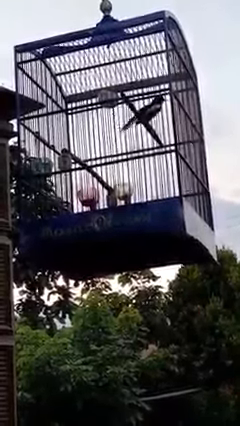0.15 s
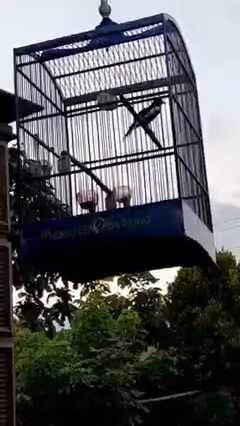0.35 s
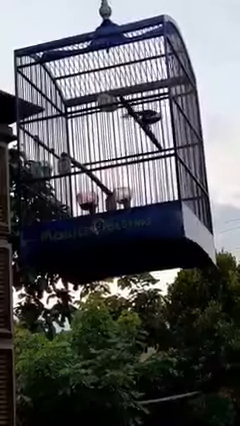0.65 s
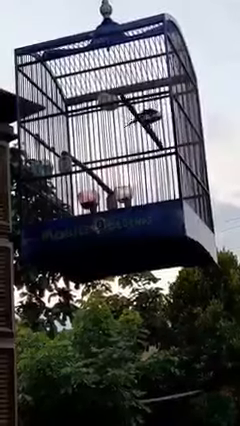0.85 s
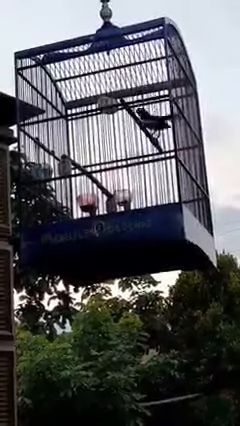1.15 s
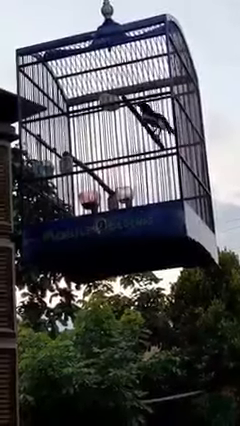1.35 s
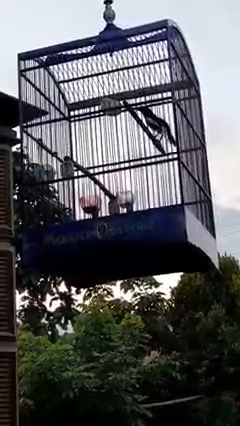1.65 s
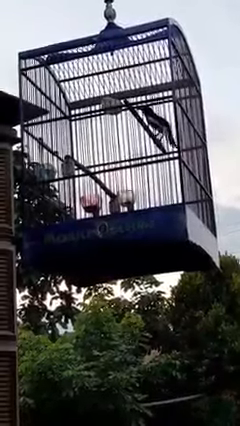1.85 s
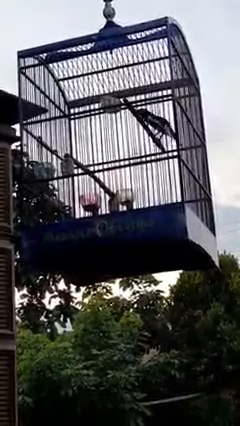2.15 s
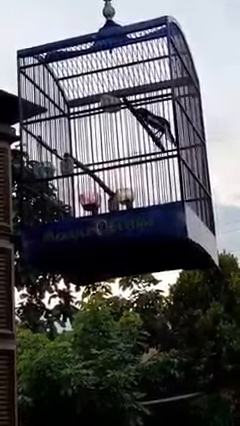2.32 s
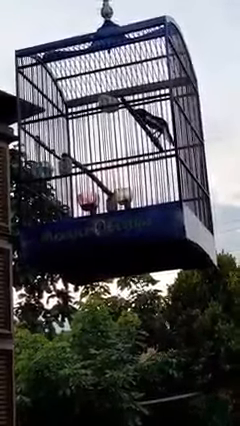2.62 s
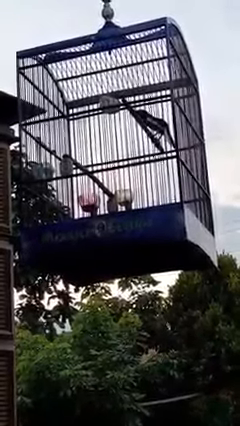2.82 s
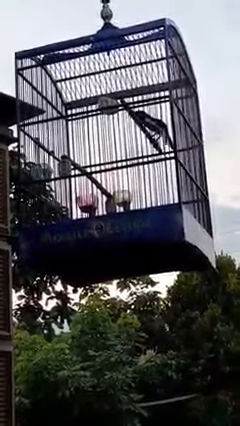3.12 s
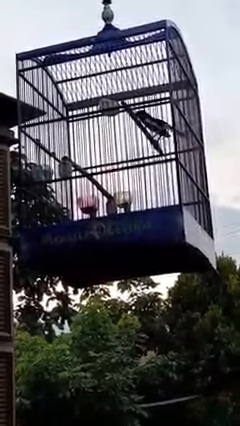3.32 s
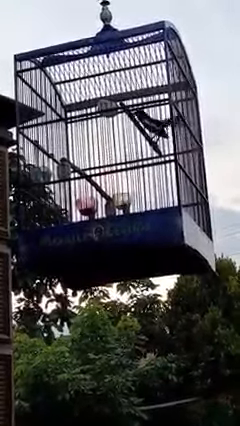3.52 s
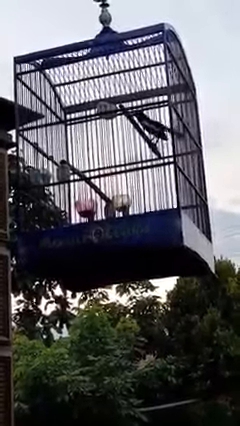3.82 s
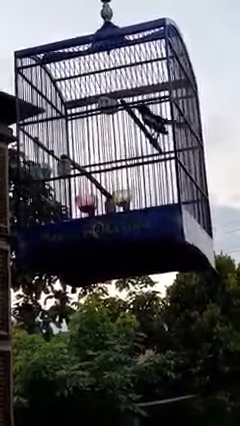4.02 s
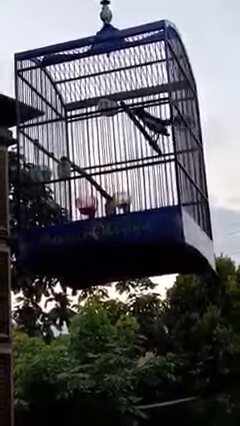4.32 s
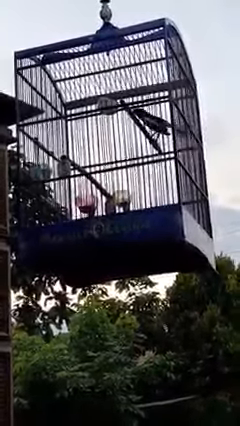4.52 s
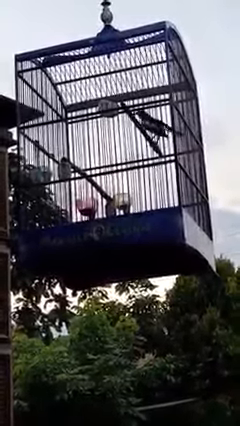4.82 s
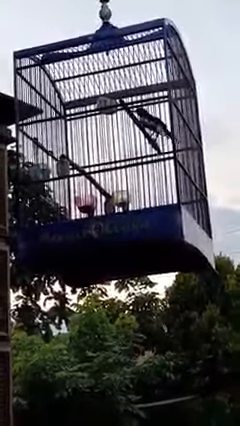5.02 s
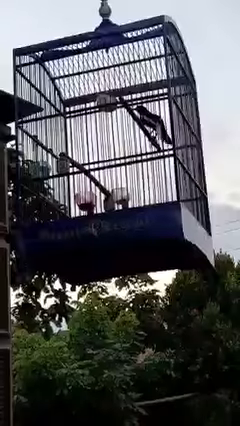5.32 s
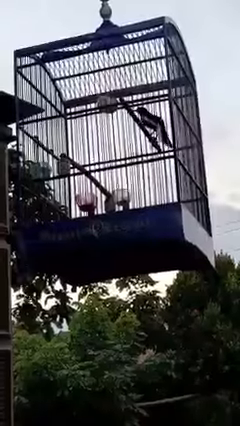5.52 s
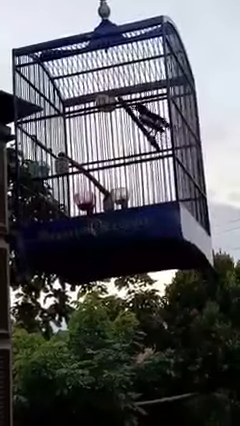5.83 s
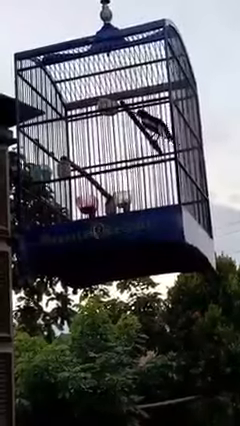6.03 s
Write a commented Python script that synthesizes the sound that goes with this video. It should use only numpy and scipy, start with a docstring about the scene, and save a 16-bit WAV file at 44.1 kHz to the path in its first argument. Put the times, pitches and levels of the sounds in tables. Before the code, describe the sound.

A caged songbird sings nearby in a yard, mixing quick clear whistles with hoarse glides, reedy warbles and rasps. Its claws tap the perch a few times early on. Near the end it changes to a run of sharp, high chips while another bird softly alternates low and high notes. A very faint rooster crows far off, and distant traffic rumbles low throughout.

```python
"""Caged magpie-robin in a yard.

Airflow shakes the bird's membranes into pure whistles, reedy twangs, rasps, slurs, nasal notes and a run
of sharp chips. Its claws tap the perch. Other birds whistle further off; a rooster crows far away.
House walls and trees answer, over the low rumble of distant traffic."""
import sys
import numpy as np
from scipy import signal
from scipy.fft import rfft, irfft, next_fast_len
from scipy.io import wavfile
from scipy.ndimage import uniform_filter1d, map_coordinates

SR = 44100
rng = np.random.default_rng(int(sys.argv[2]) if len(sys.argv) > 2 else 0)


def log_audio(samples):
    """Write samples as a 16-bit WAV file to the path given in sys.argv[1]."""
    # one column per channel
    frames = np.atleast_2d(samples).T
    # limit to full scale, then quantise
    limited = np.clip(frames, -1, 1)
    pcm = np.round(limited * 32767).astype(np.int16)
    wavfile.write(sys.argv[1], SR, pcm)


N = 271653
TIME_S = np.arange(N) / SR


def amp(db):
    """Decibels to gain."""
    return 10 ** (np.asarray(db) / 20)


def unit(x):
    """x at rms 1."""
    return x / np.sqrt(np.mean(x ** 2) + 1e-20)


def along(points, hz):
    """Interpolate (frequency [Hz], value) points on a log axis."""
    knots_hz, values = np.transpose(points)
    return np.interp(np.log(hz + 1), np.log(knots_hz + 1), values)


def gate(t, start_s, end_s, edge_s):
    """1 from start to end, soft edges outside."""
    rise = np.clip((np.minimum(t - start_s, end_s - t) + edge_s) / edge_s, 0, 1)
    return np.sin(rise * np.pi / 2) ** 2


def wobble(rate_hz, size=N):
    """Smooth random curve, rate_hz knots a second."""
    knots = rng.standard_normal(size // 4 + 8)
    return map_coordinates(knots, [np.arange(size) * rate_hz / SR], mode="mirror")


def filtered(x, response):
    """Apply a gain that depends on frequency."""
    size = next_fast_len(N + SR // 4)
    return irfft(rfft(x, size) * response(np.fft.rfftfreq(size, 1 / SR)), size)[..., :N]


def noise(spectrum):
    """Coloured noise, rms 1."""
    return unit(filtered(rng.standard_normal(N), lambda hz: amp(along(spectrum, hz))))


def glides(table, rise_db, fall_db, bend, swell=1.12):
    """Note paths (time [s], pitch [Hz], level [dB]); bend 1 glides straight, 2 rounds the crest."""
    x = np.linspace(-1, 1, num=41)
    away, before = np.abs(x), x < 0
    return [(start_s + attack_s + x * np.where(before, attack_s, release_s),
             crest_hz + (np.where(before, start_hz, end_hz) - crest_hz) * away ** bend,
             crest_db - np.where(before, rise_db, fall_db) * away ** swell)
            for start_s, attack_s, release_s, start_hz, crest_hz, end_hz, crest_db in table]


# Breath spectrum: (frequency [Hz], level [dB])
BREATH = [(3500, -35.5), (5500, 9.5), (6500, 14.5), (7800, 15), (8800, -10.5), (11500, 6), (14500, 4.5),
          (16000, -13)]

def sing(paths, harmonics_db, jitter, flutter_db, flutter_hz, edge_s, hiss_db=-60, order=1):
    """A membrane vibrates; uneven airflow shakes it and hisses. Harmonic `order` follows each path."""
    tone, flow = np.zeros((2, N))
    for path_s, path_hz, path_db in paths:
        i = np.arange(max(0, int((path_s[0] - edge_s) * SR)), min(N, int((path_s[-1] + edge_s) * SR)))
        t = i / SR
        pitch_hz = uniform_filter1d(np.interp(t, path_s, path_hz), 160) / order  # muscles round corners
        shaken_hz = pitch_hz * (1 + jitter * wobble(flutter_hz, len(t)))
        phase = 2 * np.pi * np.cumsum(shaken_hz) / SR
        wave = sum(amp(db) * np.sin(k * phase) * (k * pitch_hz < SR / 2)
                   for k, db in enumerate(harmonics_db, 1))
        level_db = np.interp(t, path_s, path_db) + flutter_db * wobble(flutter_hz, len(t))
        level = amp(level_db) * gate(t, path_s[0], path_s[-1], edge_s)
        tone[i] += np.sqrt(2) * wave * level
        flow[i] += level
    return tone + amp(hiss_db) * flow * noise(BREATH)


def stereo_noise(spectrum, side_db):
    """Common noise plus a side noise of opposite sign in each channel."""
    return noise(spectrum) + amp(side_db) * np.array([[1], [-1]]) * noise(spectrum)


# Rumble envelope: (time [s], level [dB])
RUMBLE_LEVEL = [(0.03, -39.5), (0.88, -44), (2.24, -43), (5.81, -41.5), (5.93, -43), (6.13, -35.5)]
# Rumble spectrum: (frequency [Hz], density [dB])
RUMBLE = [(13, -48), (22, -26.5), (54, -1), (102, 1.5), (225, -6), (296, -9.5), (407, -20), (468, -23.5),
          (560, -24), (600, -27), (780, -29), (1320, -120)]

def rumble(deep_hz=75, deep_start_db=-15, fade_s=1.54):
    """A low, distant rumble; the deepest bass fades in at the start."""
    level_db = np.interp(TIME_S, *np.transpose(RUMBLE_LEVEL))
    full = amp(level_db) * stereo_noise(RUMBLE, side_db=-15.5)
    deep = filtered(full, lambda hz: 1 / (1 + (hz / deep_hz) ** 4))
    deep_db = deep_start_db * np.clip(1 - (TIME_S / fade_s) ** 2, 0, 1)
    return full - deep + amp(deep_db) * deep


# Air spectrum: (frequency [Hz], density [dB])
AIR = [(240, -15), (400, -5.5), (2190, -10.5), (2430, -9), (4490, -7.5), (6680, -15), (7910, -16),
       (9500, -21), (13900, -15), (15500, -28)]

def open_air():
    """A wide, slowly wavering hiss."""
    return amp(-56 + 2.9 * wobble(2.1)) * stereo_noise(AIR, side_db=-0.5)


# Whistles: (start [s], attack [s], release [s], start [Hz], crest [Hz], end [Hz], crest [dB])
WHISTLES = [ (0.0, 0.0017, 0.018, 6000, 5920, 5780, -30.5), (0.112, 0.019, .012, 3730, 4310, 4150, -19),
            (0.178, 0.017, 0.039, 2020, 2638, 2496, -20), (0.243, 0.013, 0.019, 2730, 3336, 3050, -24),
            (1.349, 0.0083, 0.032, 6180, 5970, 5990, -19.5),
            (1.714, 0.0096, 0.036, 5520, 5800, 5890, -14.5), (1.945, 0.051, 0.06, 2340, 2660, 2560, -23),
            (2.4, 0.0089, 0.019, 3190, 3000, 3000, -20), (2.432, 0.0068, 0.0386, 2875, 2837, 2772, -11.5),
            (2.492, 0.026, 0.015, 2720, 2790, 3020, -19), (3.09, 0.048, 0.025, 3130, 2897, 2890, -17.5),
            (4.215, 0.058, 0.059, 2685, 2830, 2858, -30.5), (4.648, 0.049, 0.033, 3280, 3030, 2976, -23), ]
# Harmonics 1, 2, ... [dB]
PURE_DB = [0, -27.5, -85]

def whistles():
    """Clear notes, almost pure sines."""
    paths = glides(WHISTLES, rise_db=10.5, fall_db=7, bend=2.07, swell=1.7)
    return sing(paths, PURE_DB, jitter=0.003, flutter_db=1.2, flutter_hz=370, edge_s=0.003)


# Twangs: (start [s], attack [s], release [s], start [Hz], crest [Hz], end [Hz], crest [dB])
TWANGS = [ (0.02, 0.00815, 0.0043, 1347, 2276, 1320, -32.5), (0.352, 0.017, 0.025, 2270, 1780, 1320, -46),
          (1.61, 0.04, 0.051, 1537, 2342, 2700, -31.5), (2.626, 0.01114, 0.03, 1517, 2340, 1360, -32),
          (2.693, 0.013, 0.0079, 1395, 2390, 2200, -31), (2.898, 0.0129, 0.034, 1470, 2257, 1417, -33),
          (2.98, 0.0137, 0.0017, 1467, 2270, 2240, -32), (4.165, .013, 0.0027, 1590, 2500, 2300, -32),
          (4.18, 0.0088, 0.0068, 2270, 2010, 2210, -29), (4.41, 0.041, 0.058, 1646, 1900, 1984, -36.5),
          (4.516, 0.0039, 0.023, 1850, 1976, 2640, -34), (4.533, 0.0119, 0.02, 2270, 2137, 1885, -31), ]
# Harmonics 1, 2, ... [dB]
REEDY_DB = [7, -9.5, -32, -22, -44]

def twangs():
    """Quick, low warbles with a reedy edge."""
    paths = glides(TWANGS, rise_db=15.5, fall_db=13.5, bend=1.2, swell=0.86)
    return sing(paths, REEDY_DB, jitter=0.019, flutter_db=3, flutter_hz=900, edge_s=0.0027, hiss_db=-17)


# Rasp bursts: (crest [s], attack [s], release [s], throat [dB], hiss [dB])
RASPS = [ (0.14, 0.11, 0.061, -41, -27.5), (1.195, 0.084, 0.029, -41, -36), (2.29, 0.082, 0.21, -38, -31.5),
         (2.67, 0.038, 0.033, -27, -35), (2.75, 0.038, 0.013, -16.5, -29),
         (2.848, 0.066, 0.024, -26, -30.5), (2.942, 0.053, .04, -28.5, -29.5),
         (3.091, 0.035, 0.11, -39, -37.5), (3.476, 0.056, 0.02, -35, -47), (4.335, 0.037, .1, -39.5, -69.5),
         ]
# Throat spectrum: (frequency [Hz], level [dB])
THROAT = [(2500, -37), (3500, -15), (3950, 5.5), (4400, -15), (4950, -4), (5600, -42)]

def rasps(pulse_hz=420, depth=0.58, drop_db=17.5):
    """Membranes flap chaotically and chop the air into rough pulses."""
    throat, hiss, air = noise(THROAT), noise(BREATH), np.zeros(N)
    for crest_s, attack_s, release_s, throat_db, hiss_db in RASPS:
        away = np.maximum((crest_s - TIME_S) / attack_s, (TIME_S - crest_s) / release_s)
        flow = amp(-drop_db * away) * gate(TIME_S, crest_s - attack_s, crest_s + release_s, 0.0031)
        air += flow * (amp(throat_db) * throat + amp(hiss_db) * hiss)
    flap_hz = pulse_hz * (1 + 0.15 * wobble(200))
    flaps = 1 + depth * np.sin(2 * np.pi * np.cumsum(flap_hz) / SR)
    return air * unit(flaps)


# Slurs: (start [s], attack [s], release [s], start [Hz], crest [Hz], end [Hz], crest [dB])
SLURS = [ (0.076, 0.021, 0.015, 4480, 5580, 6200, -27), (0.135, 0.007, 0.024, 4190, 3850, 2980, -26),
         (0.155, 0.0075, 0.016, 6500, 5980, 5300, -27), (1.085, 0.038, 0.011, 1668, 2480, 3000, -25.5),
         (1.145, 0.042, 0.014, 3394, 4370, 4890, -13.5), (1.49, 0.044, 0.04, 3220, 4200, 5220, -18.5),
         (2.025, 0.022, 0.032, 2160, 2040, 1132, -32), (2.195, 0.026, 0.024, 2980, 3730, 5150, -24.5),
         (2.238, .043, .028, 5420, 5356, 5740, -21), (2.255, 0.033, 0.034, 5900, 6580, 6190, -23),
         (2.397, 0.0073, 0.011, 4200, 4020, 3910, -22.5), (4.315, 0.009, 0.025, 4420, 4650, 4200, -38), ]
# Harmonics 1, 2, ... [dB]
HOARSE_DB = [1, -13.5, -11.5, -28]

def slurs():
    """Fast, hoarse glides."""
    paths = glides(SLURS, rise_db=14.5, fall_db=11, bend=1, swell=1.36)
    return sing(paths, HOARSE_DB, jitter=0.027, flutter_db=4, flutter_hz=1100,
                edge_s=0.0047, hiss_db=-23)


# Nasal notes: (start [s], attack [s], release [s], start [Hz], crest [Hz], end [Hz], crest [dB])
NASALS = [ (0.355, 0.0344, 0.0273, 2032, 2407, 2430, -29.5), (0.425, 0.031, .13, 2494, 2431, 2130, -31.5),
          (2.095, .06, 0.077, 2406, 2995, 2967, -30), (2.285, 0.0488, 0.047, 2410, 2663, 2780, -31.5),
          (4.095, 0.15, 0.012, 4000, 5560, 5630, -45), ]
# Harmonics 1, 2, ... [dB]
NASAL_DB = [-15, 1, -15.5, -24, -80, -46.5, -30.5, -27.5]

def nasals():
    """Held notes led by the second harmonic."""
    paths = glides(NASALS, rise_db=2, fall_db=9, bend=1.6, swell=0.72)
    return sing(paths, NASAL_DB, jitter=0.011, flutter_db=3.5, flutter_hz=800,
                edge_s=0.006, hiss_db=-19, order=2)


# Claw strikes: (time [s], level [dB])
TAPS = [(0.63, -52), (0.8915, -26), (0.9018, -34), (1.4566, -28), (1.478, -26.5)]
# Perch spectrum: (frequency [Hz], level [dB])
PERCH = [(300, -1), (1200, -1.5), (2200, 3.5), (5000, 8.5), (8000, -9), (15000, -5)]

def taps(t60_s=0.034):
    """Claws strike the dead wood of the perch."""
    blows = sum(amp(db - 60 * np.abs(TIME_S - s) / t60_s) * (TIME_S >= s) for s, db in TAPS)
    return blows * noise(PERCH)


# Faint calls: (start [s], attack [s], release [s], start [Hz], crest [Hz], end [Hz], crest [dB])
FAINT_CALLS = [ (0.7, 0.18, 0.31, 827, 790, 815, -60.5), (1.15, 0.11, .08, 840, 885, 910, -56.5),
               (3.22, 0.12, 0.13, 1330, 1282, 1253, -57), (4.745, 0.081, .012, 4740, 5640, 5460, -48.5),
               (5.61, 0.046, 0.18, 1280, 1270, 1190, -56), ]

def faint_calls():
    """Faint whistles: four low, distant ones and one thin rising note from the robin."""
    paths = glides(FAINT_CALLS, rise_db=3, fall_db=0.5, bend=1.6)
    return sing(paths, PURE_DB, jitter=0.0084, flutter_db=4.5, flutter_hz=190, edge_s=0.0058)


# Yelps: (start [s], attack [s], release [s], start [Hz], crest [Hz], end [Hz], crest [dB])
YELPS = [(0.785, 0.014, 0.021, 3120, 3510, 4250, -27.5), (1.383, 0.013, .015, 3216, 3320, 3790, -29)]
# Harmonics 1, 2, ... [dB]
BRIGHT_DB = [0, 0, -16, -11]

def yelps():
    """Short, bright notes, rising in pitch and level to the end."""
    paths = glides(YELPS, rise_db=8, fall_db=-2.5, bend=0.9)
    return sing(paths, BRIGHT_DB, jitter=0.0097, flutter_db=3, flutter_hz=1300, edge_s=0.0038)


# Crow syllables: (start [s], attack [s], release [s], start [Hz], crest [Hz], end [Hz], crest [dB])
CROW = [ (1.7, 0.063, 0.03, 538, 566, 580, -47), (1.9, 0.095, .09, 610, 624, 610, -57.5),
        (2.13, .05, 0.025, 563, 535, 503, -52), (2.52, 0.334, .66, 639, 703, 665, -55.5), ]

def rooster():
    """One far crow: four syllables, the last drawn out."""
    paths = glides(CROW, rise_db=6, fall_db=3, bend=2.4)
    return sing(paths, harmonics_db=[0, -25], jitter=0.004, flutter_db=0.8, flutter_hz=49, edge_s=0.04)


# Scold: (start [s], attack [s], release [s], start [Hz], crest [Hz], end [Hz], crest [dB])
SCOLD = [(3.47, .105, 0.17, 1890, 3112, 1524, -32)]
# Harmonics 1, 2, ... [dB]
HARSH_DB = [-19, 0.5, -11.5, -22, -42]

def scold():
    """A harsh, arching note led by the second harmonic."""
    paths = glides(SCOLD, rise_db=10, fall_db=12, bend=1.3)
    return sing(paths, HARSH_DB, jitter=0.022, flutter_db=5.5, flutter_hz=1100,
                edge_s=0.0054, hiss_db=-16.5, order=2)


# Squeaks: (start [s], attack [s], release [s], start [Hz], crest [Hz], end [Hz], crest [dB])
SQUEAKS = [(3.833, 0.013, 0.032, 4550, 4420, 4410, -29), (3.952, 0.0373, 0.017, 3775, 4387, 4510, -31.5)]
# Harmonics 1, 2, ... [dB]
SQUEAKY_DB = [-44, -2.5, -7.5, 4, -25, -15, -31, -26.5, -41, -25.5]

def squeaks():
    """Brief notes led by the fourth harmonic."""
    paths = glides(SQUEAKS, rise_db=11.5, fall_db=10.5, bend=1.88)
    return sing(paths, SQUEAKY_DB, jitter=0.015, flutter_db=-1.8, flutter_hz=620,
                edge_s=0.012, hiss_db=-31, order=4)


# Seesaw notes: (attack [s], release [s], start [Hz], crest [Hz], end [Hz], crest [dB])
LOW_NOTE = (.07, .065, 1400, 1545, 1690, -37.5)
HIGH_NOTE = (0.08, 0.14, 2659.5, 2715, 2771.5, -31.5)

def seesaw(start_s=4.823, period_s=0.469, high_after_s=0.268, step_db=-1.1):
    """A neighbouring bird sings low, high, low, high, low, fading slightly."""
    beats_s = start_s + period_s * np.arange(3)
    lows = [(s, *LOW_NOTE) for s in beats_s]
    highs = [(s + high_after_s, *HIGH_NOTE) for s in beats_s[:-1]]
    paths = glides(lows + highs, rise_db=8.5, fall_db=8, bend=0.81, swell=1)
    song = sing(paths, PURE_DB, jitter=0.011, flutter_db=0.5, flutter_hz=124, edge_s=0.008)
    fade_db = step_db * (TIME_S - beats_s.mean()) / period_s
    return amp(fade_db) * song


# Chips: (start [s], drop [s], crest [Hz], end [Hz], crest [dB])
CHIPS = [ (4.824, 0.02, 7004, 4160, -23.5), (5.143, 0.031, 6885, 5110, -23), (5.458, .026, 6820, 4870, -26),
         (5.69, 0.024, 6830, 4720, -26.5), (5.915, 0.023, 6520, 4160, -25.5),
         (6.112, 0.017, 6930, 4150, -22.5), ]
# Harmonics 1, 2 [dB]
FLICK_DB = [0, -20.5]
DROP_DB = [0, -17.5]

def chips(attack_s=0.016, hold_s=0.008, start_hz=4140):
    """A clean flick upward, a short hold, then the voice breaks and drops hoarsely."""
    flicks, drops = [], []
    for start_s, drop_s, top_hz, end_hz, db in CHIPS:
        break_s = start_s + attack_s + hold_s
        flicks.append((start_s, attack_s, hold_s, start_hz, top_hz, top_hz, db))
        drops.append((break_s, drop_s / 2, drop_s / 2, top_hz, (top_hz + end_hz) / 2, end_hz, db))
    up = sing(glides(flicks, rise_db=20, fall_db=1.5, bend=1.3, swell=1.2), FLICK_DB,
              jitter=0.0062, flutter_db=-2.5, flutter_hz=686, edge_s=0.003, hiss_db=-24.5)
    down = sing(glides(drops, rise_db=12.5, fall_db=11, bend=0.92), DROP_DB,
                jitter=0.022, flutter_db=6.5, flutter_hz=1500, edge_s=0.0025, hiss_db=-40.5)
    return up + down


# Yard decay: (frequency [Hz], T60 [s])
YARD_T60 = [(500, 0.57), (2500, 0.39), (6000, 0.35), (14000, 0.27)]

def yard(x, direct_db, wall_db, wet_db, wall_s=0.011, gap_s=0.003, early_db=2, early_s=0.011):
    """Direct sound arrives left first; a wall ahead answers in both channels, leaves and houses later."""
    hz, t, spectra = signal.stft(rng.standard_normal((2, int(SR * 0.6))), SR, nperseg=256)
    decay = amp(-60 * t / along(YARD_T60, hz)[:, None])
    tail = signal.istft(spectra * decay, SR, nperseg=256)[1]
    age_s = np.arange(tail.shape[1]) / SR
    tail *= (age_s > gap_s) * (1 + amp(early_db) * np.exp(-age_s / early_s))
    response = amp(wet_db) * tail / np.linalg.norm(tail, axis=1, keepdims=True)
    response[[0, 1], [0, 9]] += amp(direct_db)  # right lags 9 samples
    response[:, round(wall_s * SR)] += amp(wall_db)
    return signal.oaconvolve(x[None], response, axes=1)[:, :N]


def scene():
    """The robin nearby, other birds further off, the town behind."""
    held = yard(whistles() + nasals() + squeaks(), direct_db=-3.5, wall_db=-10, wet_db=-4)
    low = yard(twangs(), direct_db=-8, wall_db=-7, wet_db=-3.5)
    chatter = slurs() + yelps() + scold() + rasps()
    rough = yard(chatter + taps(), direct_db=-6, wall_db=-11.5, wet_db=-3)
    turned = yard(chips(), direct_db=-10.5, wall_db=-8, wet_db=4.5)  # beak points away: much echo
    turned *= amp([[-1], [1]])
    faint = yard(seesaw() + faint_calls() + rooster(), direct_db=-2, wall_db=-21.5, wet_db=-7)
    return (held + low + rough + turned + faint + rumble() + open_air()) * amp([[-0.9], [0.9]])


def record(dry, top_hz=15750):
    """The robin's overtones dip between 7 and 10 kHz; the whole mix is shaped so and cut at top_hz."""
    # (frequency [Hz], gain [dB])
    colour = [(7000, 0), (7600, -13), (9500, -3), (11800, -2.5), (13200, -3), (14500, -3.5)]
    return filtered(dry, lambda hz: amp(along(colour, hz)) * (hz < top_hz))


dry = scene()
out = record(dry)
log_audio(out)
```